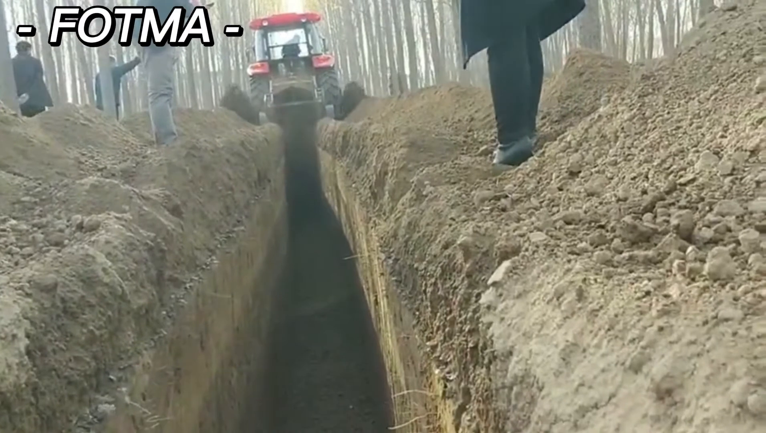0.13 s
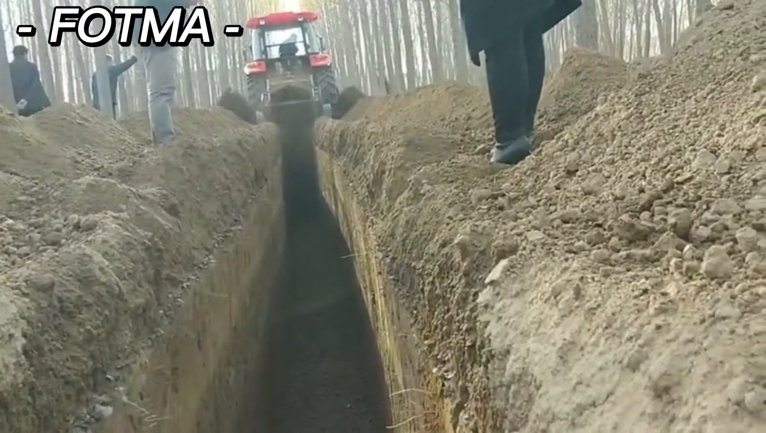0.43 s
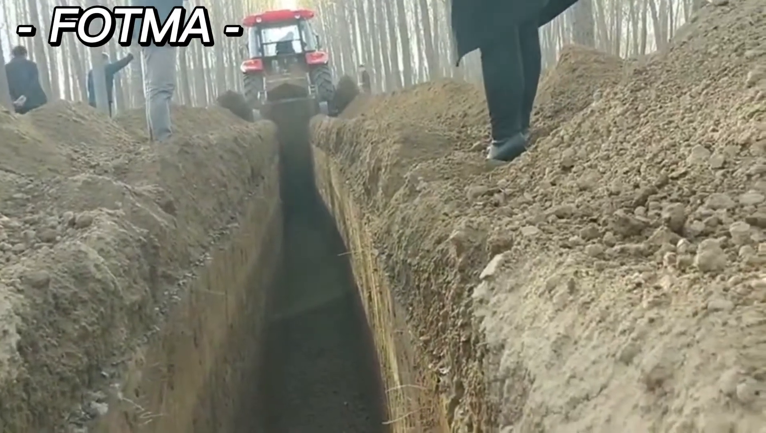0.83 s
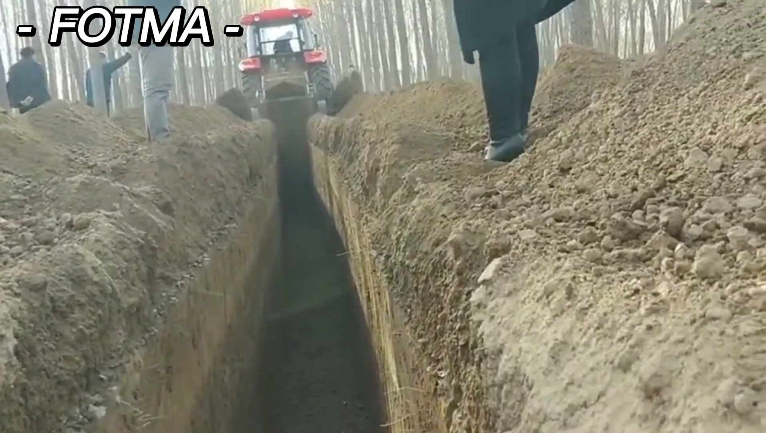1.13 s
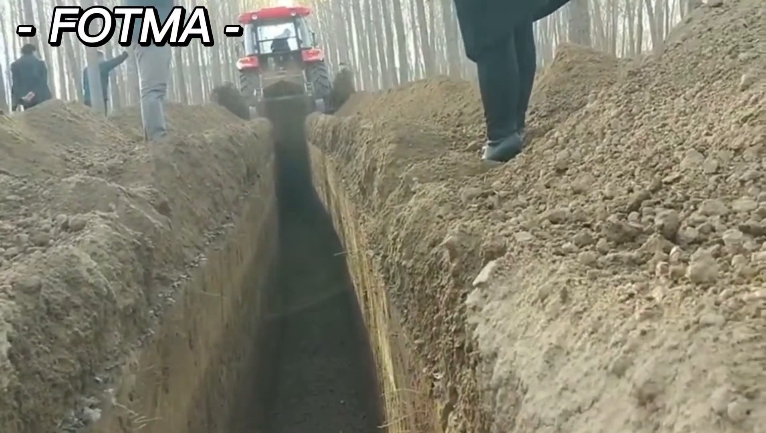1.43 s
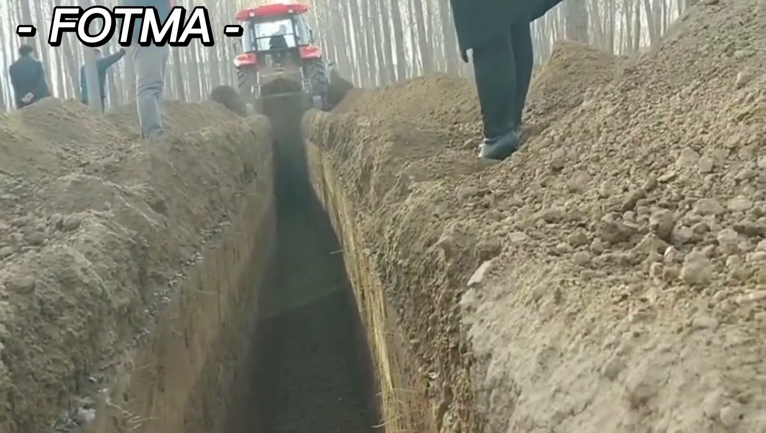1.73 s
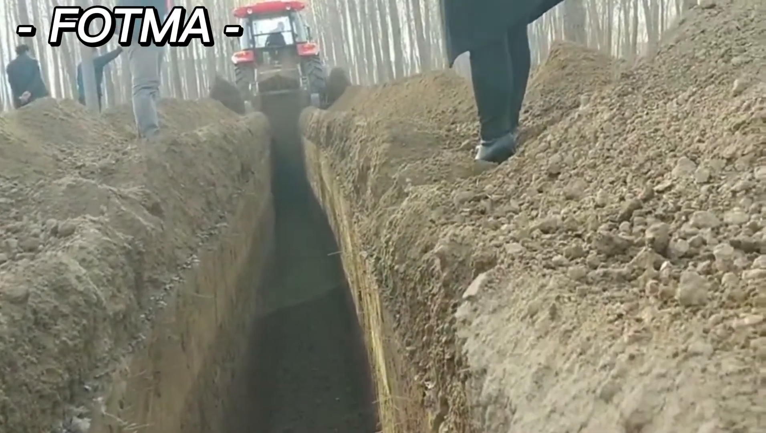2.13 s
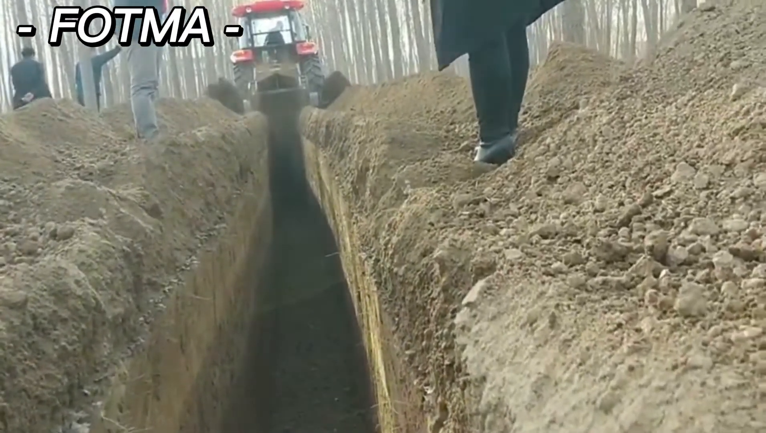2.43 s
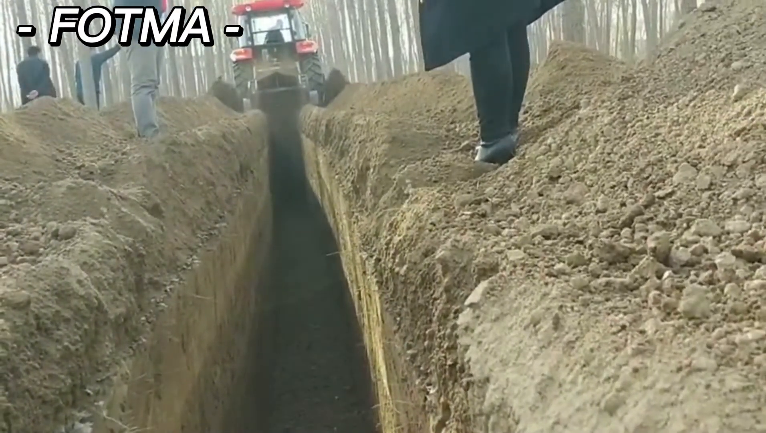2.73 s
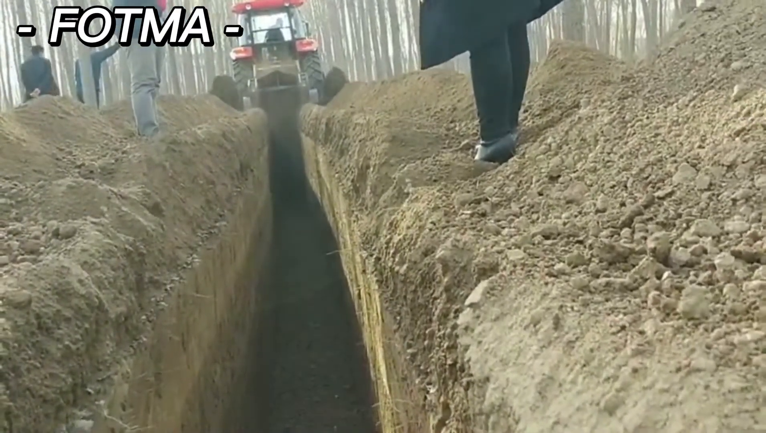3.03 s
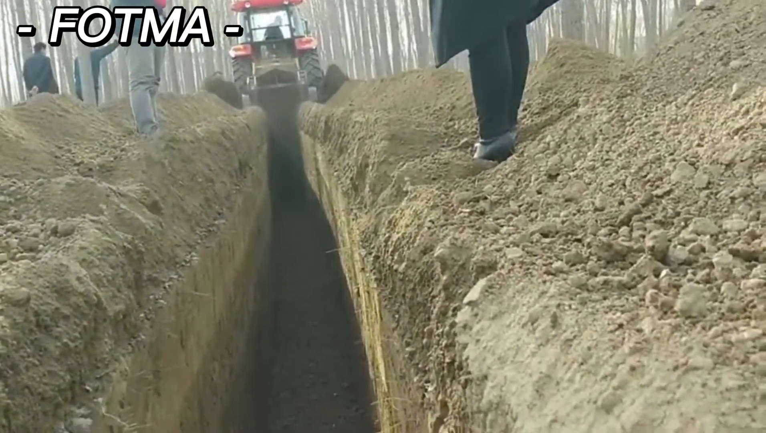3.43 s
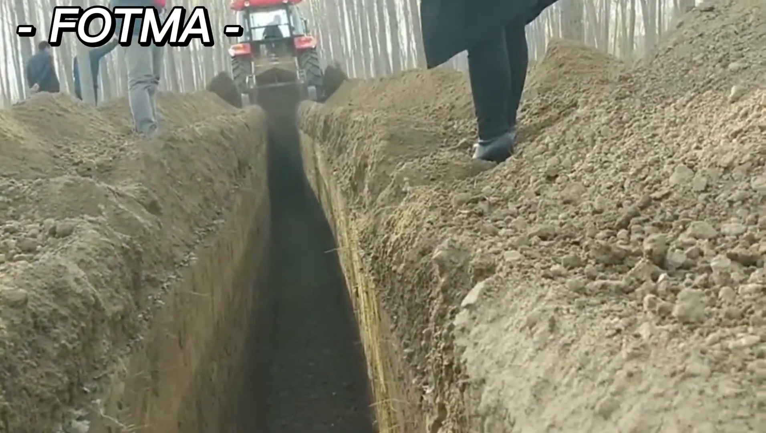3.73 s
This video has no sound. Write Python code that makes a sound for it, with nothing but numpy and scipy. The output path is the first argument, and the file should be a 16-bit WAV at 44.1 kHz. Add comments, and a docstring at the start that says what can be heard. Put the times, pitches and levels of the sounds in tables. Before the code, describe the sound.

Steady diesel tractor roar with rough chain scraping and rattling, some way off outdoors

```python
"""Across a field, some way off: a four-cylinder diesel tractor drags a chain trencher through dry soil.
The exhaust is a set of wavering low tones that swell and sink in a bed of rumble; each firing knocks as a noise burst.
The chain is scraping noise with random ticks; panels growl on engine orders and a few single clacks stand out.
Air buffets the two small microphones as lumps of low noise.
The right microphone turns duller while the left thins, and later the left dulls too."""
import sys
import numpy as np
from scipy import signal
from scipy.fft import rfft, irfft
from scipy.io import wavfile
from scipy.ndimage import uniform_filter1d

SR = 44100
rng = np.random.default_rng(int(sys.argv[2]) if len(sys.argv) > 2 else 0)


def dump_mix(stems):
    """Bounce the given channels to the path in sys.argv[1] as a 16-bit WAV at rate SR."""
    frames = np.atleast_2d(stems).T  # one column per channel
    limited = np.clip(frames, -1, 1)  # hard clip at full scale
    pcm = np.round(limited * 32767).astype(np.int16)
    wavfile.write(sys.argv[1], SR, pcm)


N = 171549  # length [samples]

# firing rate of the engine: (time [s], rate [firings per s])
FIRING_RATE = [(0, 93), (.3, 93.27), (.7, 93.52), (1.2, 93.04), (1.7, 93.68), (2.15, 91.93), (2.55, 93.48),
               (3.0, 93.39), (3.3, 91.7), (3.6, 93.4), (3.88, 91.87)]
# colour of the whole machine heard along the trench: (frequency [Hz], relative density [dB])
MACHINE_COLOUR = [(200, -4), (260, -6), (340, -10), (450, -4), (520, -7), (590, -17), (660, -9),
                  (740, -3.5), (850, -5.5), (1000, -5), (1400, -2), (1580, -13.5), (1800, -7.5), (2150, -5),
                  (3000, -2.5), (3400, -3.5), (3800, -8.5), (4400, -7), (5500, -8), (6100, -4.5),
                  (7200, -4.5), (8200, -11), (9000, -11.5), (10000, -25), (11000, -19), (15500, -26)]


def exhaust(firings):
    """Harmonic radiation: tones tied to the firing phase, randomly modulated, swell over steady rumble."""
    # exhaust tones: (multiple of the firing rate [1], level against the boom [dB])
    tones = [(.77, -18), (1, 0), (2, -24), (3.47, -31)]
    # dull rumble around the exhaust note: (frequency [Hz], relative density [dB])
    rumble_colour = [(15, -14), (35, -13), (55, -2.5), (72, 0.5), (95, 4.5), (125, -0.5), (160, -3),
                     (200, -15), (260, -41), (500, -61)]
    # boom in the right microphone against the left: (time [s], level [dB])
    right_level = [(0, -1), (1.3, -2), (1.45, -5), (3.1, -1.5)]
    waver, waver_hz = 0.12, 60  # rms of each quadrature against the steady tone; corner of its spectrum
    rumble_db = -30

    lines = 0
    for multiple, db in tones:
        carrier = np.exp(2j * np.pi * (multiple * firings + rng.random()))
        modulation = 1 + waver * (drift(waver_hz) + 1j * drift(waver_hz))
        lines = lines + amp(db) * np.sqrt(2) * (modulation * carrier).real
    common, apart = coloured(hiss(), rumble_colour)
    rumble = common + 0.5 * np.array([apart, -apart])
    boom = lines * boom_level() + amp(rumble_db) * rumble
    return boom * np.array([np.ones(N), amp(curve(right_level))])


def boom_level():
    """Amplitude modulation: each swell rises and sinks in one sine arch until the next begins."""
    # swells of the low sound: throbs of the boom, mixed with air buffeting from 3.2 s on:
    # (start [s], peak level [dB])
    swells = [(0.0, -23.5), (0.095, -24.5), (0.181, -19.5), (0.271, -20), (0.351, -18.5), (0.424, -17.5),
              (0.494, -19), (0.536, -18.5), (0.676, -17.5), (0.867, -20), (1.032, -22), (1.118, -17),
              (1.229, -18.5), (1.265, -18.5), (1.313, -17), (1.376, -20.5), (1.448, -17.5), (1.556, -18.5),
              (1.6, -16.5), (1.692, -21), (1.778, -18), (1.868, -23.5), (1.926, -21), (2.064, -20.5),
              (2.1, -23), (2.175, -21), (2.249, -19.5), (2.473, -18.0), (2.629, -17), (2.817, -19.5),
              (3.013, -19.5), (3.154, -21), (3.248, -17.5), (3.337, -27), (3.366, -23), (3.495, -27),
              (3.536, -23.5), (3.583, -20.5), (3.68, -23), (3.766, -27), (3.817, -16), (3.862, -29)]
    dip = .36  # amplitude between swells, as a part of the peak
    starts, peak_db = np.transpose(swells)
    count = np.arange(len(starts) + 1)
    place = np.interp(np.arange(N), np.append(starts * SR, N), count)
    peak = amp(np.interp(place, count[:-1] + .5, peak_db))
    arch = np.sin(np.pi * (place % 1))
    return peak * (dip + (1 - dip) * arch)


def knock(firings):
    """Impulsive excitation: each firing starts a brief noise burst with its own strength and colour."""
    # strength of alternate cylinders: (level [dB])
    cylinders_db = [-1.7, 1.7]
    # tilt of the machine's colour for the knock: (frequency [Hz], level [dB])
    tilt = [(100, -49), (900, -17), (1800, -6.5), (3000, -3.5), (4800, 4), (7000, 0), (9000, -0.5),
            (15000, -17)]
    rise_s, decay_s, scatter_db = .0008, .0034, 1.2
    knock_db, patchy_db = -26, 3  # level ahead of the microphones; rms of the patches of colour
    surge_hz, surge_db = 6.6, 1.3

    which = firings.astype(int)
    age = firings % 1 / curve(FIRING_RATE)  # seconds since the firing
    scatter = scatter_db * rng.standard_normal(N)[which]
    strength = amp(np.take(cylinders_db, which, mode="wrap") + scatter)
    burst = strength * (1 - np.exp(-age / rise_s)) * np.exp(-age / decay_s)
    surge = amp(surge_db * np.sin(2 * np.pi * surge_hz * np.arange(N) / SR))
    grain = to_sound(patchy(hiss(), patchy_db, size=256)[2], size=256)
    return amp(knock_db) * coloured(grain * burst * surge, MACHINE_COLOUR, tilt)


def chain():
    """Friction and impact noise: teeth scrape the soil while links and clods tick at random."""
    # level of the chain: (time [s], level [dB])
    chain_level = [(0, 3), (2, 0.84), (3.1, 1.5), (3.4, -0.8), (3.89, 1)]
    # tilt of the machine's colour for the scrape: (frequency [Hz], level [dB])
    tilt = [(100, -13.5), (250, -1), (1200, -1), (2200, -3), (4500, -3.5), (7000, -4), (9000, -6),
            (15000, -5.5)]
    scrape_db, clatter_db = -25, -34  # ahead of the chain's level and the microphones
    ticks_per_s, spread_db, decay_s = 220, 5, .0015
    flutter_db, flutter_hz = 0.4, 60

    level = amp(curve(chain_level) + flutter_db * drift(flutter_hz))
    strength = amp(spread_db * np.minimum(rng.exponential(1, N), 3))
    ticks = (rng.random(N) < ticks_per_s / SR) * strength
    ticks = signal.lfilter([1], [1, -np.exp(-1 / (decay_s * SR))], ticks)  # each tick dies away
    scrape = amp(scrape_db) * coloured(hiss(), MACHINE_COLOUR, tilt)
    clatter = amp(clatter_db) * coloured(hiss() * ticks, MACHINE_COLOUR)
    return level * (scrape + clatter)


def growl(firings):
    """Forced vibration: panels rattle on two engine orders amid rough noise in the frame; both throb."""
    # level of the growl: (time [s], level [dB])
    growl_level = [(0, -37), (.15, -30.5), (.3, -44), (.8, -35.5), (1.3, -49), (1.65, -36.5), (1.85, -33),
                   (2.05, -34.5), (2.22, -31.5), (2.4, -33.5), (2.7, -39), (2.95, -31), (3.15, -26.5),
                   (3.32, -46), (3.45, -24.5), (3.6, -30.5), (3.89, -42)]
    # noise in the frame: (frequency [Hz], relative density [dB])
    noise_colour = [(200, -27), (450, 2.5), (590, -9.5), (740, 0), (850, 0.5), (1000, -1.5), (1350, -3.5),
                    (1580, -14), (4000, -51)]
    # rattling panels: (multiple of the firing rate [1], relative level [dB])
    orders = [(8, 0), (9, -2)]
    throbs_per_firing, throb_db = 0.082, 3.5
    waver_hz, change_hz = 11, 12  # rms swing of the pitch; corner of the random changes
    tone_db = -5  # rattle against the noise

    throb = throb_db * np.sin(2 * np.pi * throbs_per_firing * firings)
    rattle = 0
    for multiple, db in orders:
        strength = amp(db) * (1 + .5 * drift(change_hz))
        waver = waver_hz * np.cumsum(drift(change_hz)) / SR
        rattle = rattle + strength * np.cos(2 * np.pi * (multiple * firings + waver))
    tone = evened(rattle) * np.array([[1], [0]])  # only in the part that both microphones share
    noise = coloured(hiss(), noise_colour)
    return amp(curve(growl_level) + throb) * (noise + amp(tone_db) * tone)


def clacks():
    """Impact decay: single harder knocks start at once and die away exponentially."""
    # single knocks: (start [s], level [dB])
    strikes = [(1.957, -13), (2.368, -18), (2.391, -17), (2.411, -18), (2.561, -15), (3.205, -19)]
    # tilt of the machine's colour for the clacks: (frequency [Hz], level [dB])
    tilt = [(300, -12), (1200, -4), (6500, 0), (12000, -10)]
    decay_s = 0.004
    t = np.arange(N) / SR
    level = sum(amp(db) * (t >= start) * np.exp(-abs(t - start) / decay_s) for start, db in strikes)
    return level * coloured(hiss(), MACHINE_COLOUR, tilt)


def microphones(x):
    """Partial coherence: shared and diffuse sound reach two ports, with resonances and changing colour."""
    # narrow fixed rings from reflections off the trench walls: (centre [Hz], width [Hz], level [dB])
    resonances = [(490, 26, 3), (738.2, 9.8, 7.5), (873.5, 19, 6), (1300, 82, 3.5), (2115, 130, 2.5),
                  (3580, 120, 4), (4330, 79, 8), (6890, 46, 8.5)]
    # level of the treble: (time [s], level [dB])
    treble_level = [(0, -6), (.12, -1), (.33, -6.5), (.43, -2), (.52, -3), (.65, -3), (.72, 1.5), (.8, -3),
                    (.88, -0.1), (1.07, -0.5), (1.16, -3.5), (1.28, -0.5), (1.5, -4.5), (1.67, -6.5),
                    (1.85, 1.5), (1.95, -1), (2.2, 0.5), (2.42, -1), (2.55, 2), (2.65, -1.5), (2.93, -3.9),
                    (3.1, -2), (3.24, 0), (3.35, -2.5), (3.68, 0.5), (3.88, -4.5)]
    # level of the top treble, from about 9.8 kHz up: (time [s], level [dB])
    top_level = [(0, 3), (1.0, -1), (1.5, 7), (1.85, -4), (2.2, 8.5), (2.4, -6.5), (2.75, 1), (3.1, -6),
                 (3.89, 2.5)]
    # left-right likeness: (frequency [Hz], coherence [1])
    likeness = [(50, 1), (700, 0.96), (1200, 0.55), (1580, 0.97), (2000, 0.69), (3000, 0.98), (3800, 0.32),
                (4500, 0.7), (6500, 0.26), (8000, 0.13), (15000, 0.51)]
    # phase by which left leads: (frequency [Hz], phase [rad])
    left_lead = [(50, 0.5), (1000, 0), (1500, -2), (1750, 0.8), (2400, -1.34), (3400, -1.43), (4500, -1.97),
                 (6500, -2.04), (8000, -4), (15000, -1)]
    # right microphone against the left: (frequency [Hz], level [dB])
    right_colour = [(200, -6.5), (450, 0.3), (800, -1.5), (1130, -6.5), (1400, -2), (1580, 6.5), (2100, -1),
                    (3400, -1.5), (5000, 4), (6200, -1.5), (7300, -4.5), (8800, -7.5), (11000, -6),
                    (15000, -4)]
    # changes of colour, all three: (frequency [Hz], level [dB])
    right_dull = [(150, 5), (260, -15), (450, -13), (590, -17), (760, -7), (1000, -9), (1130, -2),
                  (1300, -3), (2000, 0.3), (3300, -2.5), (3800, -5), (4800, -0.8), (6500, -8.5),
                  (8000, -7.5), (12000, -4.3)]
    left_thin = [(150, 0.5), (260, -11), (450, -2), (900, -1.5), (1300, 0.04), (2200, 1.5), (3000, -6),
                 (4400, 0.5), (8000, -1)]
    left_dull = [(200, 14.5), (450, -18), (700, -8), (930, -18.5), (1400, 0.5), (2400, -1), (2750, -5),
                 (3100, -29), (3600, -13), (4200, -4), (5000, -25), (6200, -5.5), (7200, -13),
                 (9000, -16.5), (14000, -17)]
    treble_hz, top_hz = 3500, 9800  # lower edges of the two bands
    first_s, first_fade_s = 1.385, 0.035  # right dulls and left thins: middle and length of the fade
    second_s, second_fade_s = 3.28, 0.22  # left dulls too
    patchy_db = 1.7

    hz, t, z = patchy(x, patchy_db, size=1024)
    hz = hz[:, None]
    rings = sum(db / (1 + (2 * (hz - centre) / width) ** 2) for centre, width, db in resonances)
    treble = curve(treble_level, t) / (1 + (treble_hz / (hz + 1)) ** 4)
    top = curve(top_level, t) / (1 + (top_hz / (hz + 1)) ** 12)
    shared, diffuse = z * amp(rings + treble + top)

    same = np.clip(read(likeness, hz), 0, 1)
    right = same * shared + np.sqrt(1 - same ** 2) * diffuse
    right = right * np.exp(-1j * read(left_lead, hz))

    first = np.clip((t - first_s) / first_fade_s + .5, 0, 1)
    second = np.clip((t - second_s) / second_fade_s + .5, 0, 1)
    left = shared * amp(first * read(left_thin, hz) + second * read(left_dull, hz))
    right = right * amp(read(right_colour, hz) + first * read(right_dull, hz))
    return to_sound(np.array([left, right]), size=1024)


def buffets():
    """Turbulent pressure: short lumps of low noise, uncorrelated at the two ports."""
    # gusts at the ports: (start [s], length [s], left level [dB], right level [dB])
    gusts = [(0, .14, -28, -32), (.92, .07, -22, -40), (1.01, .06, -27, -24), (1.305, .065, -36, -21),
             (3.2, .06, -21, -42), (3.255, .07, -17, -42), (3.33, .055, -13.5, -42), (3.37, .13, -15, -40),
             (3.48, .08, -20, -40), (3.628, .06, -15.5, -41), (3.685, .08, -14, -38),
             (3.77, .13, -18.5, -37)]
    # noise of the air: (frequency [Hz], relative density [dB])
    air_colour = [(20, -32), (60, -3), (110, 4.5), (210, 1), (300, -5.5), (420, -13), (560, -24),
                  (900, -57), (3000, -77.5)]
    lump_db, lump_hz = 1, 45
    edge_share = .25  # full slope of each edge, as a part of the length

    t, level = np.arange(N) / SR, np.zeros((2, N))
    for start, length, left_db, right_db in gusts:
        to_edge = np.minimum(t - start, start + length - t)
        shape = np.clip(to_edge / (edge_share * length) + 0.26, 0, 1)  # edges reach a little outside
        level = np.maximum(level, amp([[left_db], [right_db]]) * shape)
    lumps = amp(lump_db * drift(lump_hz))
    return level * coloured(hiss() * lumps, air_colour)


def amp(db):
    """Level definition: decibels to an amplitude ratio."""
    return 10 ** (np.asarray(db) / 20)


def evened(x):
    """Normalisation: scales to rms 1."""
    return x / np.sqrt(np.mean(abs(x) ** 2) + 1e-20)


def read(points, hz):
    """Logarithmic frequency scale: a spectrum table interpolated at the given frequencies."""
    f, value = np.transpose(points)
    return np.interp(np.log(hz + 1), np.log(f + 1), value)


def curve(points, t=None):
    """Linear interpolation: a time table at the given times, or at every sample."""
    return np.interp(np.arange(N) / SR if t is None else t, *np.transpose(points))


def coloured(x, *spectra):
    """Linear filtering: shapes by the summed spectra [dB] and scales to rms 1."""
    hz = np.fft.rfftfreq(N, 1 / SR)
    gain = amp(sum(read(s, hz) for s in spectra))
    return evened(irfft(rfft(x) * gain, N))


def drift(rate_hz):
    """Low-passed noise: a slow random signal of rms 1, drawn at a coarse rate."""
    t = np.arange(0, N / SR, 1 / 1024)
    hz = np.fft.rfftfreq(len(t), t[1])
    lowpass = 1 / (1 + (hz / rate_hz) ** 2) ** 2
    slow = irfft(rfft(rng.standard_normal(len(t))) * lowpass, len(t))
    return np.interp(np.arange(N) / SR, t, evened(slow))


def hiss():
    """White noise: two uncorrelated channels."""
    return rng.standard_normal((2, N))


def patchy(x, depth_db, size):
    """Short-time spectrum: frequencies [Hz], times [s] and values, with random patches of level."""
    hz, t, z = signal.stft(x, SR, nperseg=size, noverlap=size * 3 // 4)
    patches = rng.standard_normal(z.shape[1:])
    patches = uniform_filter1d(patches, size=7, axis=0)  # across frequency
    patches = uniform_filter1d(patches, size=9, axis=1)  # across time
    return hz, t, z * amp(depth_db * evened(patches))


def to_sound(z, size):
    """Overlap-add: short-time spectra back to sound."""
    return signal.istft(z, nperseg=size, noverlap=size * 3 // 4)[1][:, :N]


def scene():
    """Superposition: exhaust, the machine's other sounds at the microphones, and the buffeting."""
    firings = .5 + np.cumsum(curve(FIRING_RATE)) / SR  # running count
    machine = knock(firings) + chain() + growl(firings) + clacks()
    return exhaust(firings) + microphones(machine) + buffets()


def record(dry):
    """Band limitation: a linear-phase low-pass filter removes the highest treble."""
    edge_hz = 15800
    lowpass = signal.firwin(511, edge_hz, window=("kaiser", 9), fs=SR)
    return signal.oaconvolve(dry, lowpass[None], "same")


dry = scene()
out = record(dry)
dump_mix(out)
```